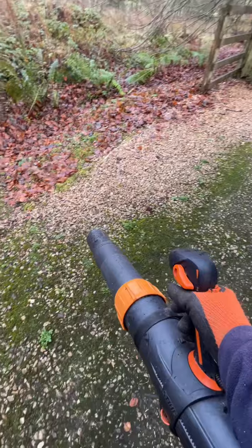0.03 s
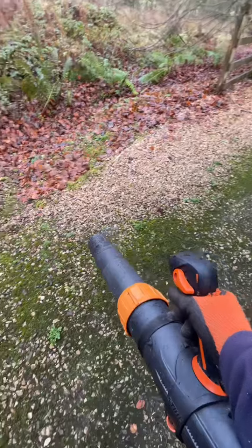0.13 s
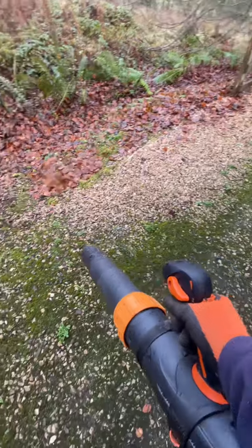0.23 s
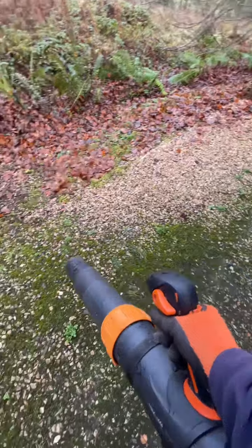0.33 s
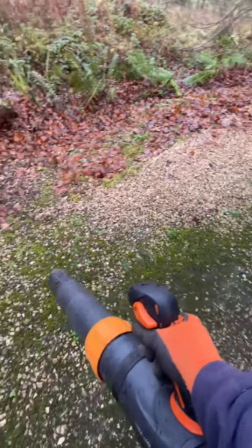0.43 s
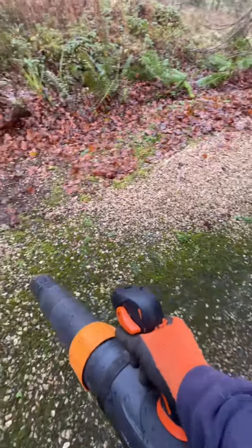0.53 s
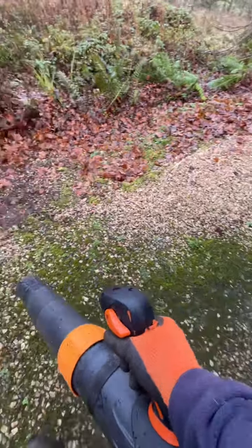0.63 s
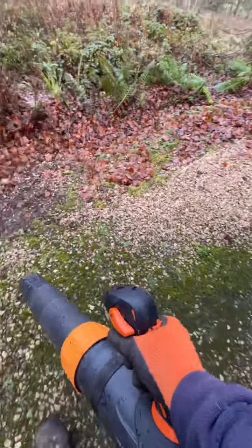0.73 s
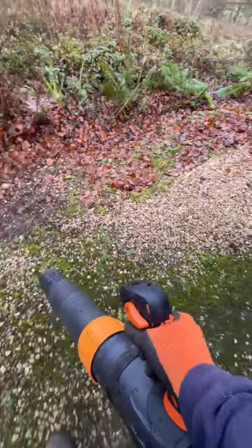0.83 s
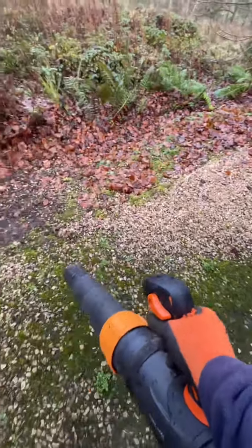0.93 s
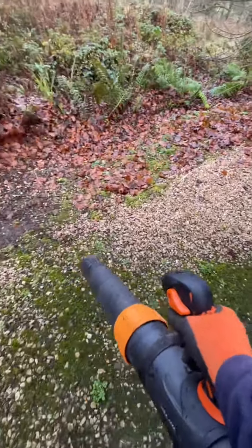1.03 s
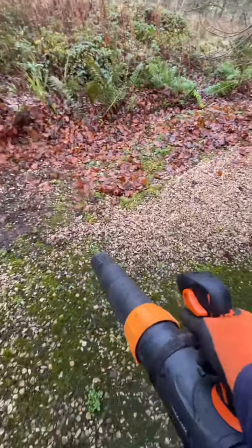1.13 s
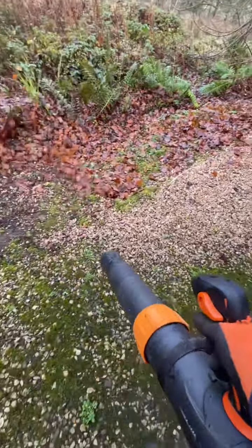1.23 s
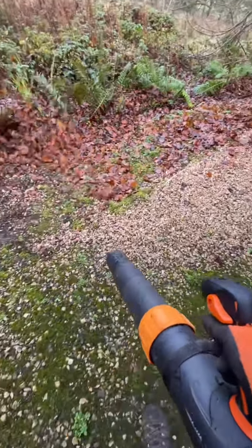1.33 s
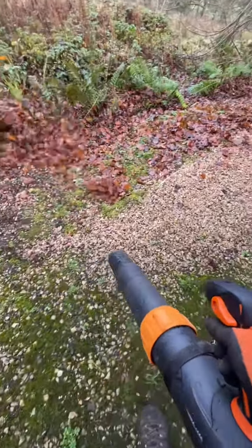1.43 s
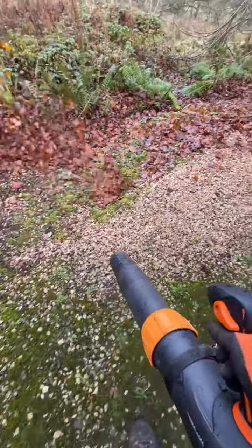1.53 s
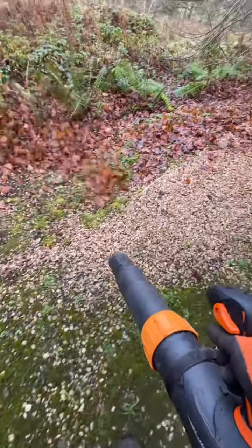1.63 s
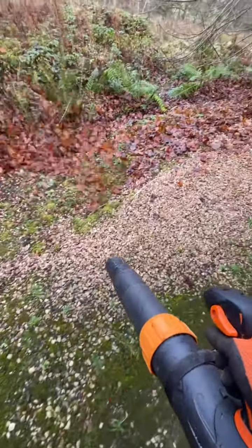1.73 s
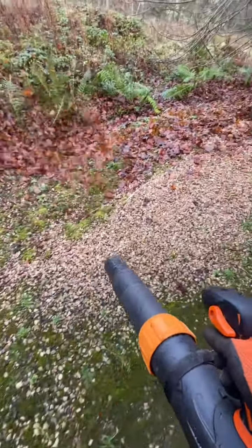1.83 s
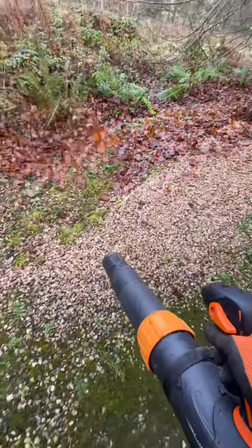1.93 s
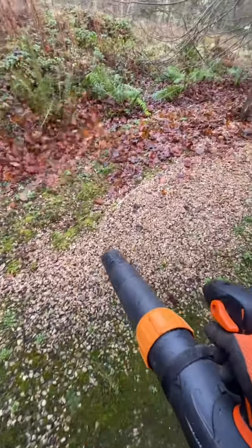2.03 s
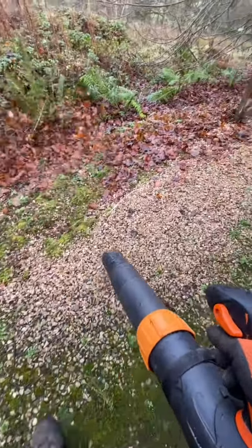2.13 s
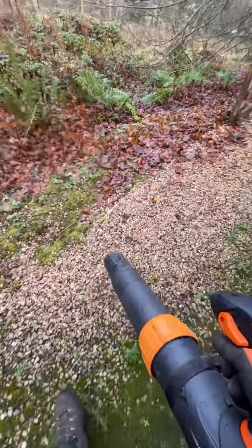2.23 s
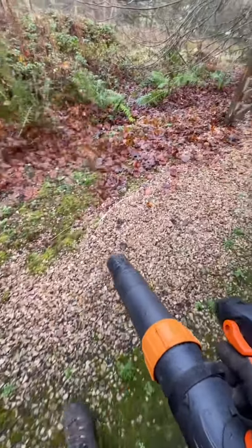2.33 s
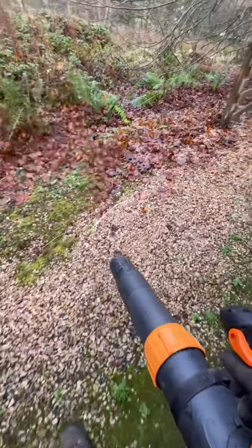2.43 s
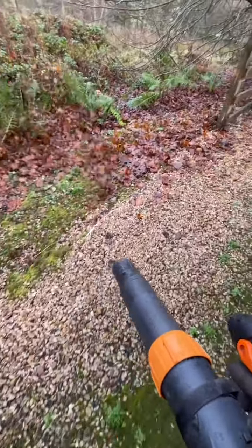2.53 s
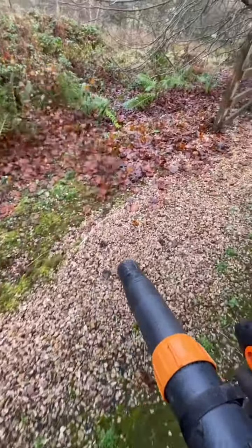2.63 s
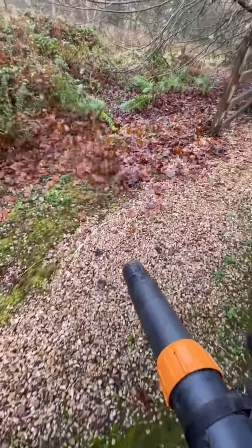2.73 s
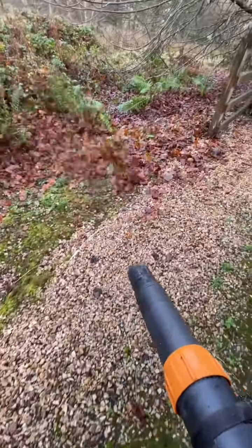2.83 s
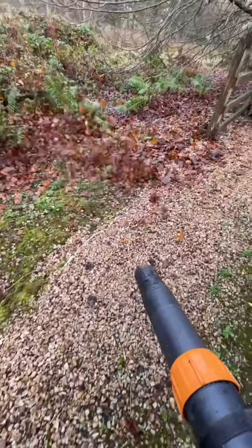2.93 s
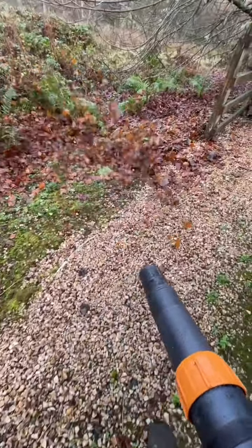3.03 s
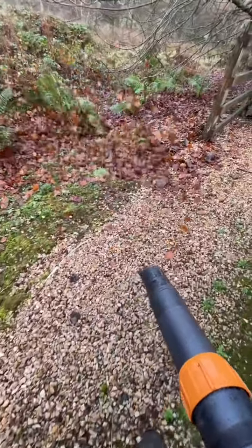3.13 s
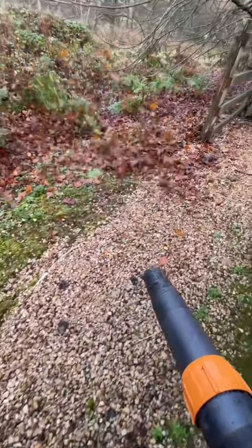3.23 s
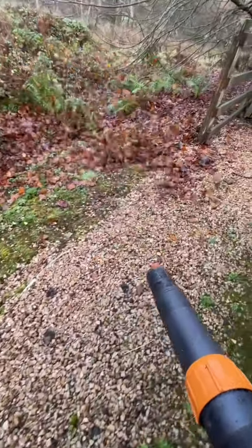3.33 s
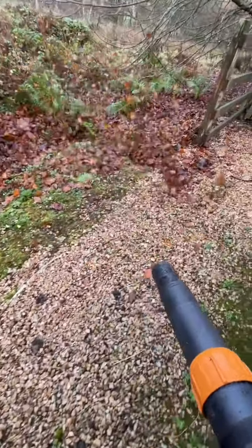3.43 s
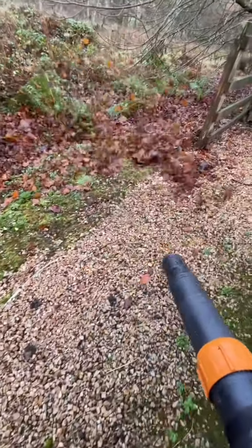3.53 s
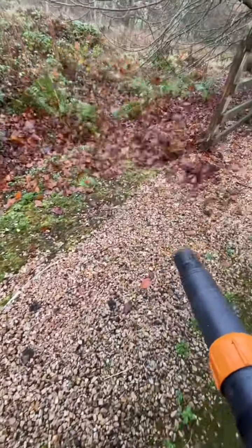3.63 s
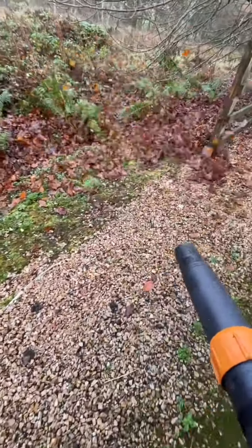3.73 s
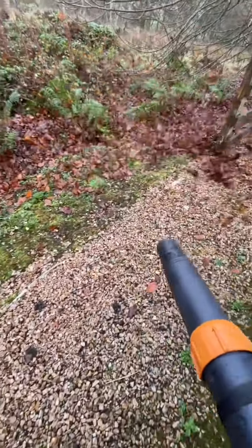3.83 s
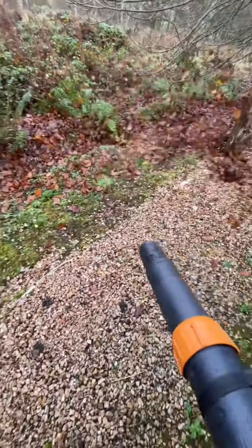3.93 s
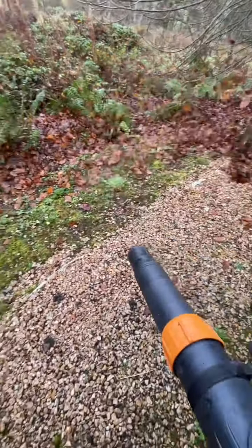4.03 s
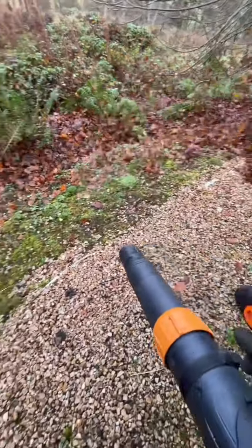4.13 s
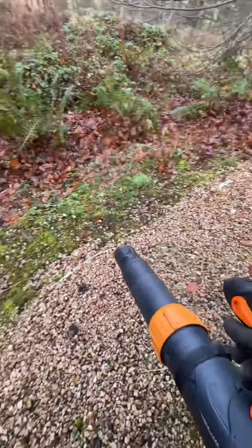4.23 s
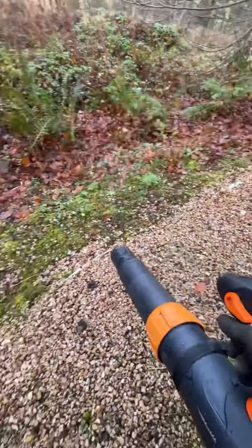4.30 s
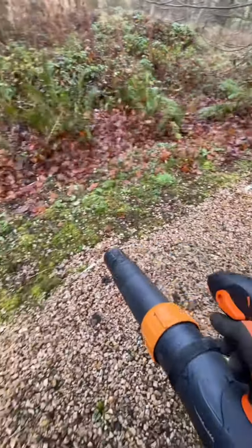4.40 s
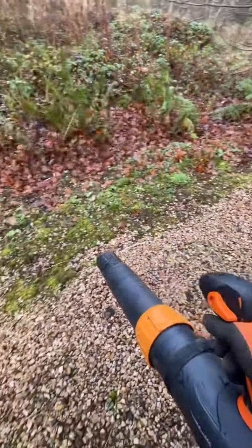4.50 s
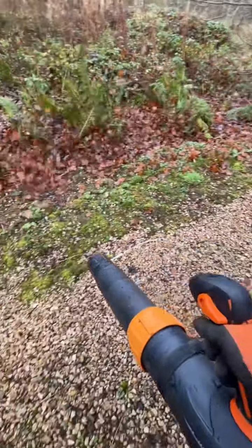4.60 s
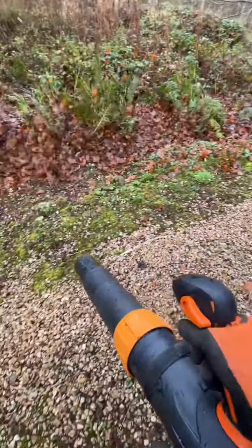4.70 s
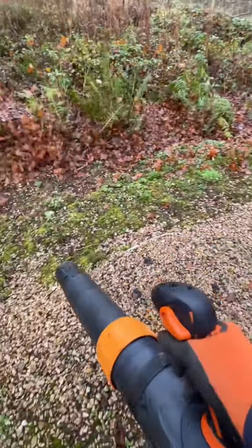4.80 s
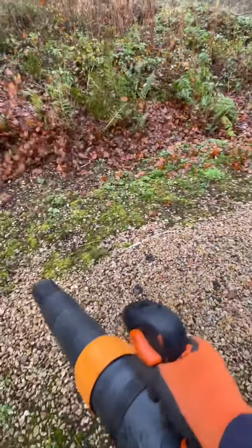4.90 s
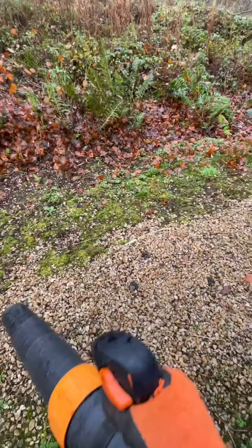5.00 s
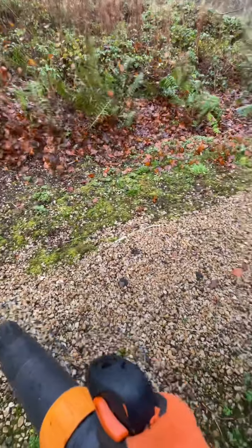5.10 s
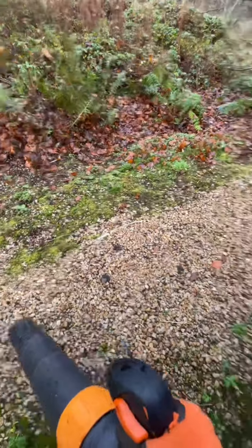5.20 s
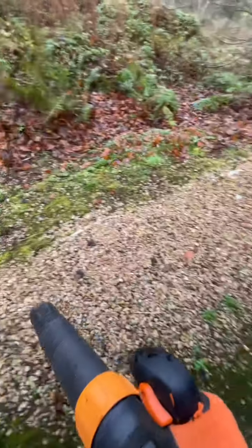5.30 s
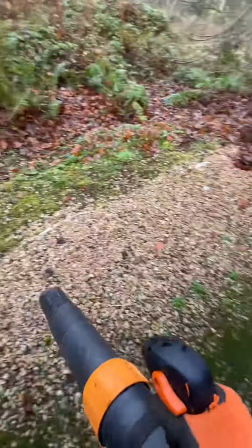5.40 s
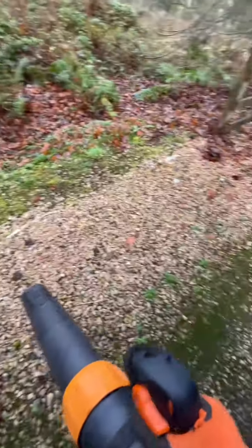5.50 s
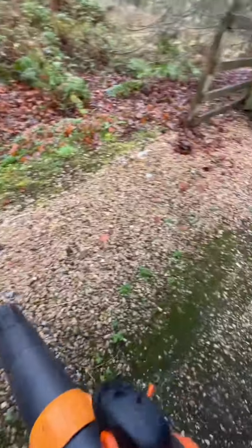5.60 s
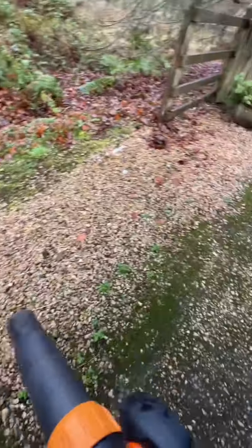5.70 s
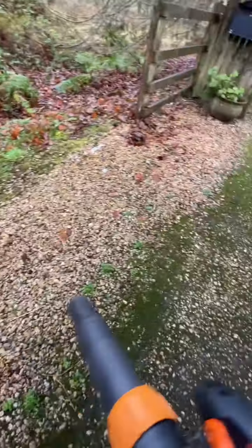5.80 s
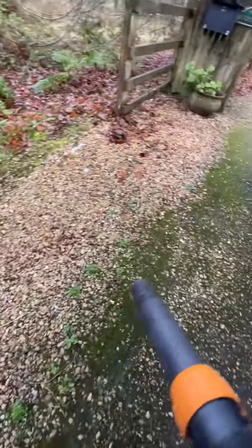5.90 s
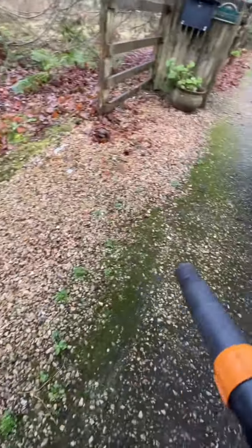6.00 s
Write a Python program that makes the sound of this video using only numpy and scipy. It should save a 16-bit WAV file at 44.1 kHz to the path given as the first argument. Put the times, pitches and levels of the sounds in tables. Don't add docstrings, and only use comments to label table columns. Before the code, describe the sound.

A handheld petrol leaf blower revs up within a second, then holds a steady low buzzing drone with rushing air, heard very close outdoors.

```python
import sys
import numpy as np
from scipy import signal
from scipy.io import wavfile
from scipy.ndimage import uniform_filter1d

SR = 44100
rng = np.random.default_rng(int(sys.argv[2]) if len(sys.argv) > 2 else 0)


def dump_mix(stems):
    frames = np.atleast_2d(stems).T
    limited = np.clip(frames, -1, 1)
    pcm = np.round(limited * 32767).astype(np.int16)
    wavfile.write(sys.argv[1], SR, pcm)


def attenuation_scalar(level_db):
    decades = np.asarray(level_db, float) / 20
    return 10 ** decades


N = 266893

# t/s, f/Hz
FIRING_RATE = [
    (.15, 30.22),
    (.26, 39.26),
    (.35, 43.43),
    (.53, 50.32),
    (.7, 54.17),
    (.88, 56.92),
    (1.2, 58.97),
    (1.65, 59.27),
    (6.05, 59.7),
]
# t/s, nearness of everything/dB, then the turn toward the microphones of
# case/dB, muffler/dB, nozzle/dB
HOLD = [(0.15, 1, -4, -12, -11), (0.28, 6.5, -4.5, -8.8, -14), (0.42, 7.5, -2.5, -13.5, -5.5),
        (0.62, 4.5, 1.7, -15.5, -6), (0.82, 1.5, 2.5, -10, -6.5), (1.1, 2.5, 1.6, -3.9, -6.0),
        (1.5, 1.6, 3, 2.3, 5), (1.95, 0.56, 3, 1.7, 3.5), (2.4, -0.45, 0.9, -0.7, -1.5),
        (2.95, 0, -0.9, -0.2, 1.9), (3.45, 0.6, 0.5, 1.9, 3), (3.95, 0.5, 1.6, 0.1, 3.2),
        (4.4, -2, 2.2, 0.1, 2.8), (4.8, -1.1, 2.5, 2.5, -0.1), (5.12, -1.9, 6.5, 6.5, 7.5),
        (5.45, -0.2, 5.5, -1.5, 1), (5.7, 1.5, 3.5, 0, 7.5), (6.05, 2.5, 2, -0.0, 4)]
# t/s, left over right/dB
ARM_SWING = [
    (0.16, 5.5),
    (1.19, 3.5),
    (1.37, 5),
    (3.24, 6),
    (3.34, 3),
    (4.47, 5),
    (4.88, 3.5),
    (5.09, 5.5),
    (6.04, 1.5),
]
# order, level at working speed/dB, share of case turn, of muffler turn, of nozzle turn
STRONG_ORDERS = [(1.0, -34.5, 1.0, 0.12, -0.3), (2.0, -28, 1.0, -0.042, -0.24),
                 (3.0, -31, 0.45, 0.39, -0.25), (4.0, -37, -0.7, -0.37, -0.73),
                 (5.0, -30.5, 0.92, -0.31, 0.17), (6.0, -41.5, 3, 0.62, -1.26),
                 (7.0, -23.5, 0.0, 0.94, -0.13), (8.0, -39.5, 0.5, -0.54, 0.35),
                 (9.0, -27.5, 0.0, -0.14, 0.9), (10.0, -37, 1.5, 0.016, -0.34),
                 (11.0, -28.5, 0.5, 0.4, 0.25), (12.0, -45, 1.3, -1.55, 0.52),
                 (13.0, -39.5, -1.36, -0.88, 1.57), (14.0, -38, -0.1, 0.14, 0.18)]
# order, level over the fan roar/dB
WEAK_ORDERS = [(15, -10.5), (19, -34), (20, -15.5), (24, -12.5), (25, -21), (36, -18)]
# order, left over right/dB
ORDER_LEAN = [(1, 0), (2, 1.1), (3, 2.5), (4, 1.5), (5, 1), (6, -4), (7, 3), (8, 7), (9, 8), (10, 2),
              (11, 10), (12, .3), (15, 3), (19, -2), (36, .5)]
# f/Hz, level/dB
PIPE = [(40.0, -2), (95.0, -1.5), (145.0, -15.5), (190.0, -6), (355.0, -11), (540.0, -10.5), (635.0, -8.5),
        (705.0, -13)]
# f/Hz, level/dB
GROUND_ECHO = [(60, -2), (120, 5), (180, -6), (300, -6), (360, 1), (536, 1.5), (620, -7.5), (715, -2.5)]
# start t/s, end t/s
ARM_DROP = (5, 5.76)
# low f/Hz, high f/Hz
CASE_FLIP = (205, 235)
# f/Hz, level per Hz/dB
ROAR_COLOUR = [(40, -12), (150, -9.5), (215, -3), (330, -6.5), (500, 1), (830, 0.5), (960, -2.5),
               (1250, -6), (1450, -6.5), (1650, -9), (2800, -10), (3150, -16), (3700, -16), (6000, -49.5)]
# f/Hz, level per Hz/dB
HISS_COLOUR = [(1800, -8), (3000, -2), (3500, -7), (4200, -1), (5200, -4.5), (5800, -2), (6700, -3),
               (8500, -8.5), (9600, -15), (10500, -14.5), (12300, -21.5), (13500, -22.5), (15000, -23),
               (15800, -25)]
# f/Hz, likeness (1 = same)
LIKENESS = [(60, .995), (250, 1), (400, 0.2), (800, 0.49), (1500, 0.096), (4000, 0.39), (7000, 0.44),
            (10000, 0.42), (15000, 0.26)]
# f/Hz, lead/radians
LEFT_LEAD = [(250, 0), (420, -.3), (600, -1.6), (800, -1.9), (1100, -3), (2150, -5.1), (3000, -2.8),
             (5800, -4.7), (7800, -3.2), (11000, -3.2), (12500, -5), (14200, -3.2)]
# f/Hz, left over right/dB
AIR_TILT = [(100, 8), (400, 10), (600, -7.7), (750, 0.5), (1200, 0), (2500, -2), (4400, 0), (8000, 0.4)]
# f/Hz, level/dB
WHISTLE_TONES = [(12231, -56), (12920, -62), (13609, -63)]
# start t/s, end t/s
WHISTLE_SPAN = (0.29, .62)
# start t/s, end t/s, depth (0-1)
THIN_SPELLS = [(.31, .61, 1), (.61, .97, .55), (.97, 1.13, .25), (1.13, 1.78, .46), (1.78, 2.55, .1),
               (2.55, 3.5, .62), (3.5, 3.8, .9), (3.8, 4.75, .55), (4.75, 5.2, .85), (5.2, 5.3, .35),
               (5.42, 5.52, .5), (5.52, 5.72, .9), (5.72, 6.1, .5)]
# low f/Hz, high f/Hz, depth at the first hole, depth at which all is empty
THIN_BANDS = [(7600, 8300, .5, 2), (8300, 9000, .45, 1.1), (9000, 9630, .05, .5), (11100, 11800, .5, 1.8),
              (11800, 12500, .88, 1), (12500, 13800, .35, 1), (13800, 15200, .2, .95),
              (15200, 15800, .05, .45), (15800, 22050, -1, 0)]
# start t/s, end t/s, low f/Hz, high f/Hz, share of cells lost
STRAY_DROPOUTS = [
    (.34, .47, 8300, 9600, 1),
    (.53, .61, 8200, 9600, 1),
    (.62, .97, 7900, 9000, .5),
    (2.65, 3.7, 3400, 3800, .4),
    (4.25, 4.7, 3400, 3900, .35),
    (2.95, 3.25, 7550, 8250, .9),
    (3.52, 3.85, 7000, 8300, .6),
    (4.85, 5.2, 8300, 9000, .95),
]
# f/Hz, share of the holes that applies (0-1)
SIDE_HOLES = [(11600, 0), (11800, .7), (13800, .6), (14000, .15), (15700, .25), (15800, 1)]
# f/Hz, size over the local mean
WEAKEST_KEPT = [(300, 0.27), (1000, 0.58), (4000, 0.77), (8500, 1), (10000, 0.82), (15000, 0.77)]

WORKING_HZ = 58.71
ROAR_DB = -34.5


def read(points, hz):
    f, value = np.transpose(points)
    return np.interp(np.log(hz + 1), np.log(f + 1), value)


def follow(rows):
    s, *columns = np.transpose(rows)
    return [np.interp(np.arange(N) / SR, s, c) for c in columns]


def evened(x):
    return x / np.sqrt(np.mean(x ** 2) + 1e-20)


def drift(top_hz):
    steps = rng.standard_normal(N // 64 + 2)
    slow = signal.lfilter(*signal.butter(2, top_hz, fs=SR / 64), steps)
    return np.interp(np.arange(N) / 64, np.arange(len(slow)), evened(slow))


def whistles():
    t = np.arange(N) / SR
    start_s, end_s = WHISTLE_SPAN
    fade_s = 0.033
    on = np.clip(np.minimum(t - start_s, end_s - t) / fade_s, 0, 1)
    return on * sum(np.sqrt(2) * attenuation_scalar(db) * np.sin(2 * np.pi * hz * t) for hz, db in WHISTLE_TONES)


def moving_air(colour, band, pan_db, rumble_db, patchy_db):
    frames, hz = N // 256 + 5, np.fft.rfftfreq(1024, 1 / SR)
    frame_start = np.arange(frames) * 256
    pan_db = np.interp(frame_start, np.arange(N), pan_db)
    rumble_db = np.interp(frame_start, np.arange(N), rumble_db)
    a, b, c, d, patches = rng.standard_normal((frames, 513, 5)).T
    patches = evened(uniform_filter1d(uniform_filter1d(patches, 9, 0), 14, 1))
    same = np.clip(read(LIKENESS, hz), -1, 1)[:, None]
    left = a + 1j * b
    copy = left * np.exp(-1j * read(LEFT_LEAD, hz))[:, None]
    right = same * copy + np.sqrt(1 - same ** 2) * (c + 1j * d)
    swing_db = np.outer(np.clip(hz / 900, 0, 1), pan_db)
    tilt = attenuation_scalar((read(AIR_TILT, hz)[:, None] + swing_db) / 2)
    field_db = read(colour, hz)[:, None] + np.outer(hz < 930, rumble_db) + patchy_db * patches
    spectrum = np.array([left * tilt, right / tilt]) * attenuation_scalar(field_db)
    x = signal.istft(spectrum, nperseg=1024, noverlap=768)[1][:, :N]
    band_filter = signal.butter(4, band, "band", fs=SR, output="sos")
    return x / np.std(signal.sosfilt(band_filter, x.mean(0)))


def air(turns, hz, near_db, pan_db):
    slow = (2 - 2 * hz / WORKING_HZ) ** 2
    catch_s, catch_width_s = 0.165, 0.0026
    catch_db = -22 * np.exp(-((np.arange(N) / SR - catch_s) / catch_width_s) ** 2)
    roar_db = ROAR_DB + near_db + 0.23 * catch_db
    hiss_db = -40.5 + 1.1 * near_db + 1.5 * slow + catch_db
    puff_db = 2 + 15.5 * slow ** 0.73
    rumble_db = -1 + 6.5 * slow
    puff = np.exp(0.89 * np.cos(2 * np.pi * (turns - .52))) - 1.2
    pan_db = 0.069 * (pan_db - pan_db.mean()) + .8 * drift(2.5)
    roar = moving_air(ROAR_COLOUR, (1000, 3500), pan_db, rumble_db, patchy_db=1.18)
    hiss = moving_air(HISS_COLOUR, (4000, 9000), pan_db, rumble_db, patchy_db=1.35)
    roar_gain = attenuation_scalar(roar_db + 0.06 * puff_db * puff + .5 * drift(34.0))
    hiss_gain = attenuation_scalar(hiss_db + 0.38 * puff_db * puff + 0.56 * drift(11))
    return roar_gain * roar + hiss_gain * hiss


def order_tone(order, turns, hz, db, pan_db):
    reach = min(order / 9, 1.3) ** 2
    lean = attenuation_scalar((read(ORDER_LEAN, order) + reach * pan_db) / 2)
    lead = max(read(LEFT_LEAD, WORKING_HZ * order), -1.7)
    mean = np.sqrt(lean ** 2 + lean ** -2 + 2 * np.cos(lead)) / 2
    smear = 0.5 * reach + 0.078 * min(order / 8, 1) ** 2 * (WORKING_HZ - hz)
    pulse_shape = 2.21
    angle = 2 * np.pi * order * turns + pulse_shape + smear * drift(0.82)
    if order == 4:
        angle = angle + np.interp(order * hz, CASE_FLIP, (0, .65 * np.pi))
    pair = np.array([lean * np.cos(angle + lead / 2), np.cos(angle - lead / 2) / lean])
    return np.sqrt(2) * attenuation_scalar(db) / np.maximum(mean, .55) * pair


def engine(turns, hz, near_db, aims_db, pan_db):
    turns = turns + 0.00045 * drift(28)
    lowered = np.interp(np.arange(N) / SR, ARM_DROP, (0, 1))
    levels = {}
    for k, (_, db, *shares) in enumerate(STRONG_ORDERS, 1):
        pipe_db = read(PIPE, k * hz) - read(PIPE, k * WORKING_HZ)
        echo_db = lowered * read(GROUND_ECHO, k * WORKING_HZ)
        waver_db = (k > 3) * np.clip(0.26 * (-32.5 - db), 0, 3) * drift(2.8)
        levels[k] = near_db + db + np.dot(shares, aims_db) + pipe_db + echo_db + waver_db
    for order, db in WEAK_ORDERS:
        levels[round(order)] = ROAR_DB + near_db + db + 3 * drift(4.1)
    swing_db = pan_db - pan_db.mean()
    pulses = sum(order_tone(k, turns, hz, db, swing_db) for k, db in levels.items())
    return pulses * attenuation_scalar(0.41 * drift(22))


def scene():
    (hz,), (pan_db,) = follow(FIRING_RATE), follow(ARM_SWING)
    near_db, *aims_db = follow(HOLD)
    turns = np.cumsum(hz) / SR
    return air(turns, hz, near_db, pan_db) + engine(turns, hz, near_db, aims_db, pan_db)


def thin_out(x):
    hz, t, z = signal.stft([x[0] + x[1], x[0] - x[1]], SR, nperseg=2048, noverlap=1536)
    luck = rng.random((len(t) // 5 + 1, 86)).T
    luck = luck.repeat(12, axis=0).repeat(5, axis=1)[:len(hz), :len(t)]
    depth = sum(d * ((t > t0) & (t <= t1)) for t0, t1, d in THIN_SPELLS)
    share = 0
    for low_hz, high_hz, first, empty in THIN_BANDS:
        in_band = (hz > low_hz) & (hz <= high_hz)
        share = share + np.outer(in_band, (depth - first) / (empty - first))
    for t0, t1, low_hz, high_hz, lost in STRAY_DROPOUTS:
        patch = np.outer((hz > low_hz) & (hz < high_hz), (t > t0) & (t < t1))
        share = np.maximum(share, lost * patch)
    side_share = np.minimum(share, 1) * read(SIDE_HOLES, hz)[:, None]
    local_mean = uniform_filter1d(abs(z), size=25, axis=1)
    strong = abs(z) > read(WEAKEST_KEPT, hz)[:, None] * local_mean
    kept = strong * np.array([luck >= share, luck >= side_share])
    total, apart = signal.istft(z * kept, SR, nperseg=2048, noverlap=1536)[1][:, :N]
    return np.array([total + apart, total - apart]) / 2


def low_pass(x):
    return signal.sosfilt(signal.butter(12, 16520, fs=SR, output="sos"), x)


def record(dry):
    ceiling, start_s = .95, .1512
    bass_cut = signal.butter(2, 38, "high", fs=SR, output="sos")
    dry = signal.sosfilt(bass_cut, dry)
    squashed = 1.059 * ceiling * np.tanh(dry / ceiling)
    mix = thin_out(squashed) + whistles()
    mix = mix * (np.arange(N) >= start_s * SR)
    return low_pass(mix)


dry = scene()
out = record(dry)
dump_mix(out)
```